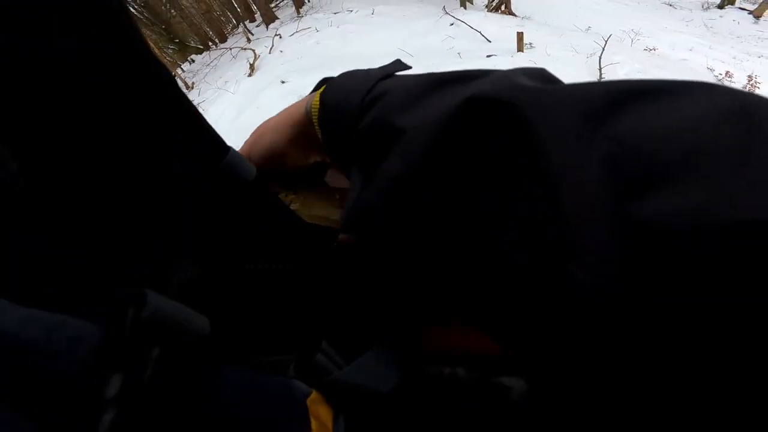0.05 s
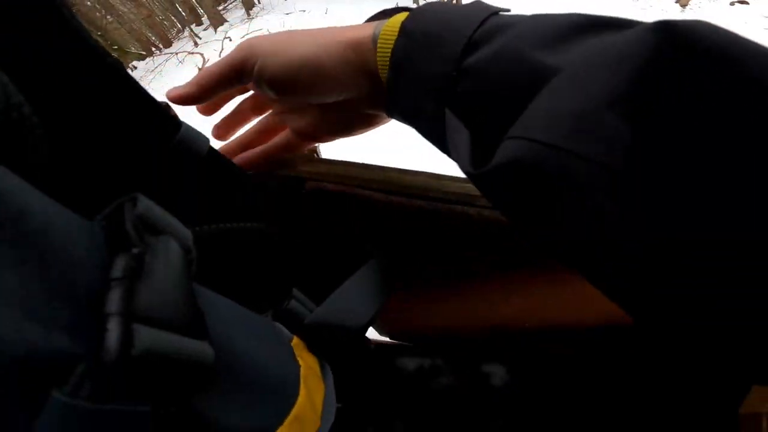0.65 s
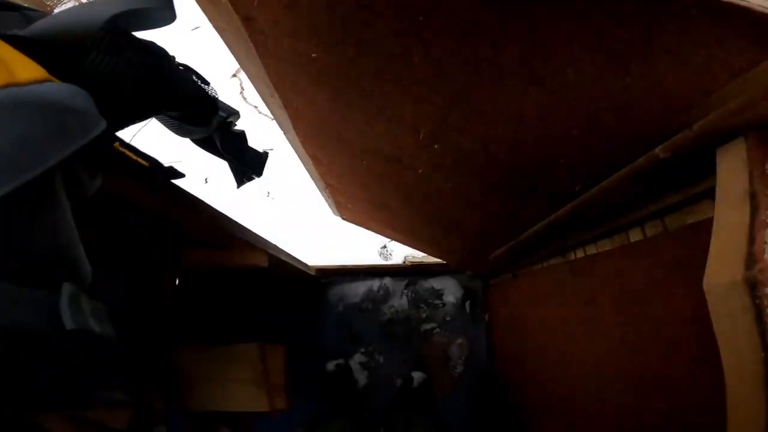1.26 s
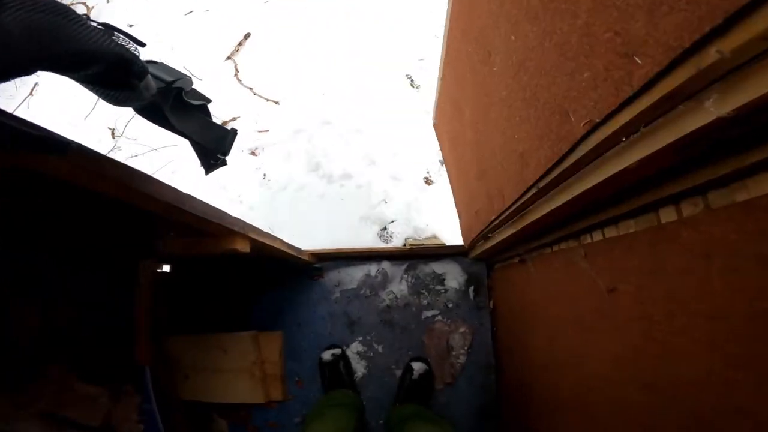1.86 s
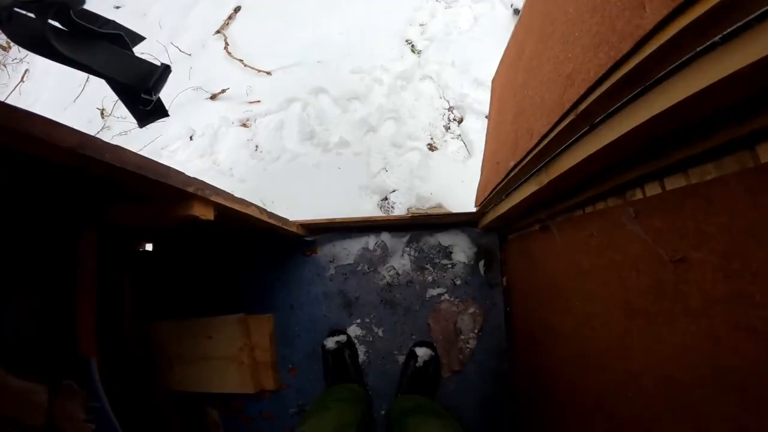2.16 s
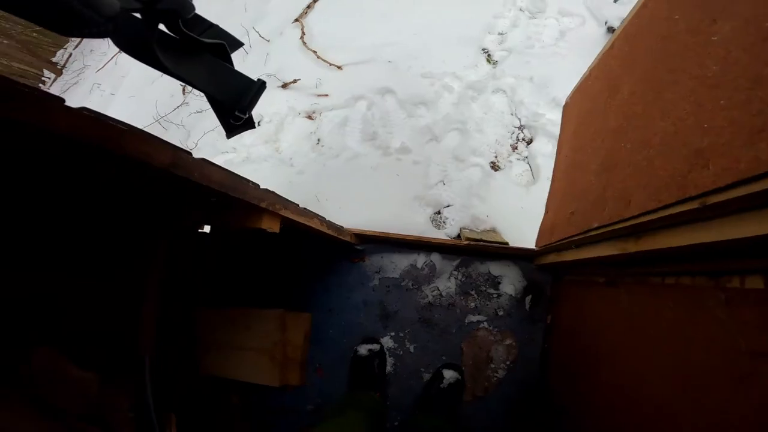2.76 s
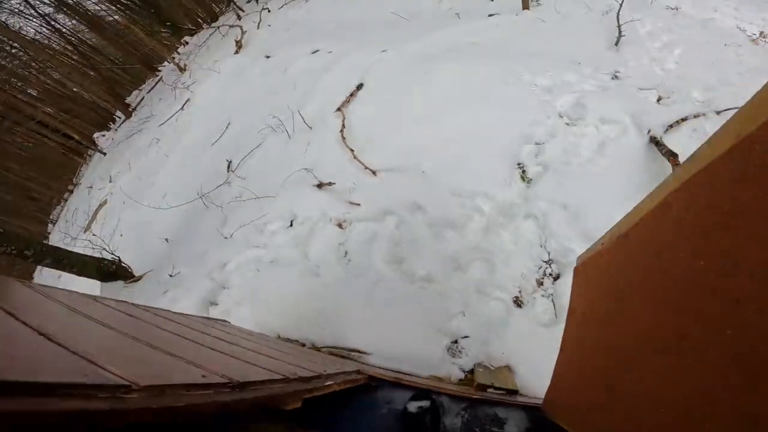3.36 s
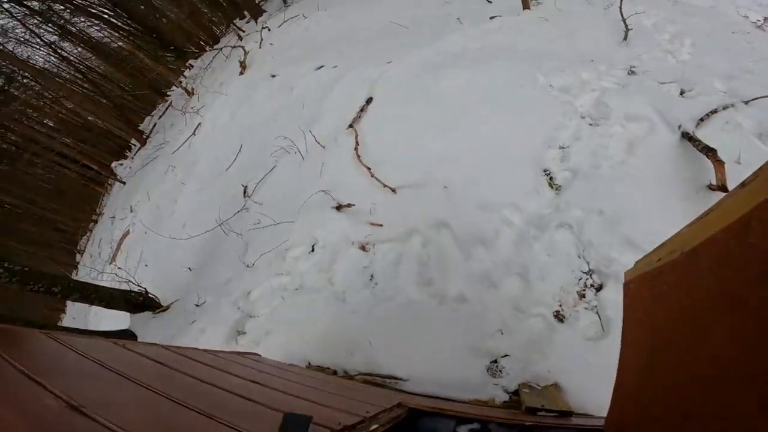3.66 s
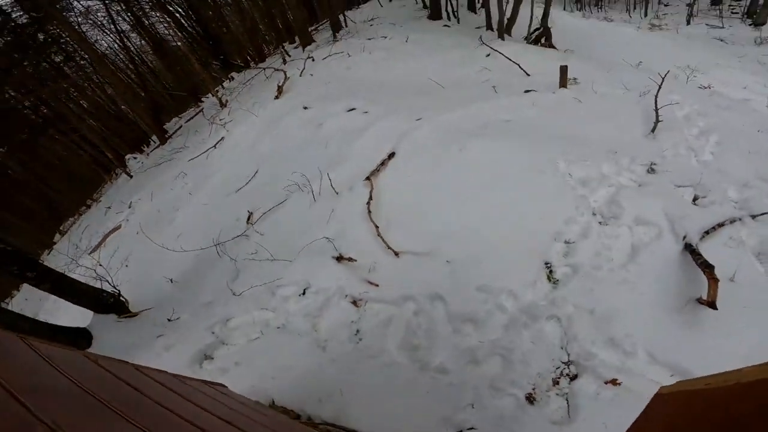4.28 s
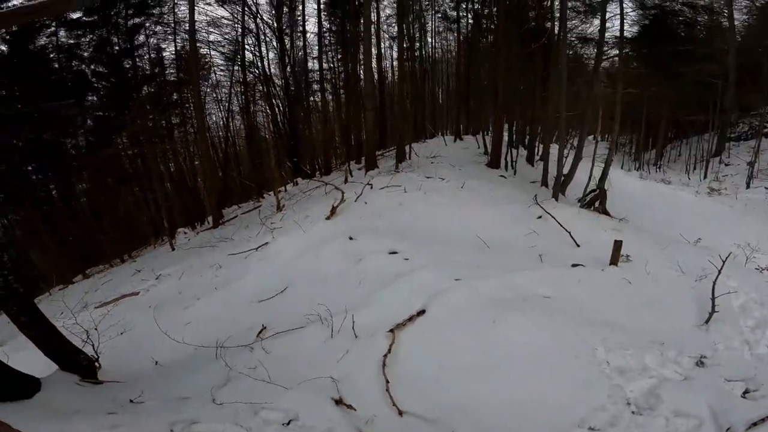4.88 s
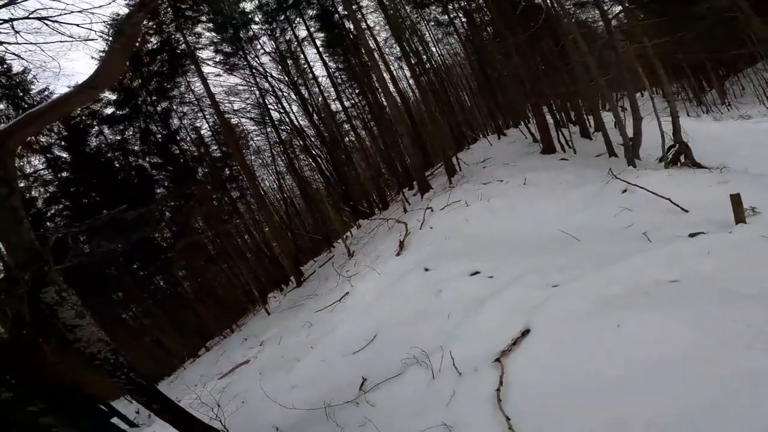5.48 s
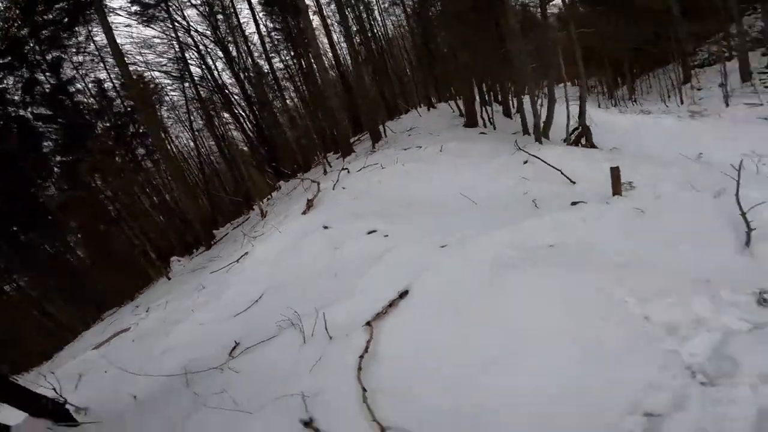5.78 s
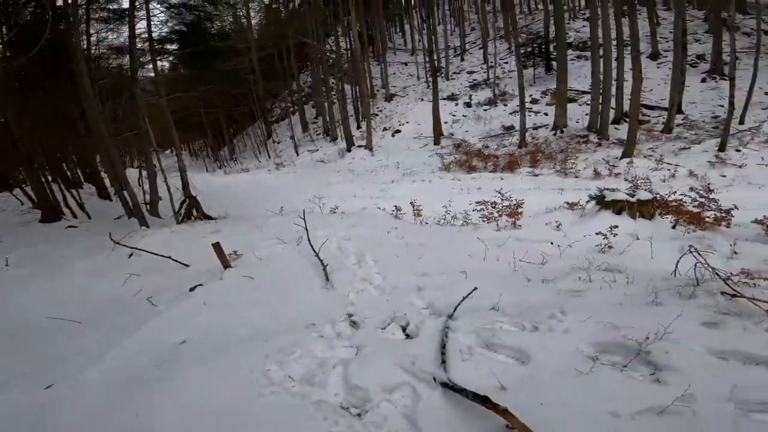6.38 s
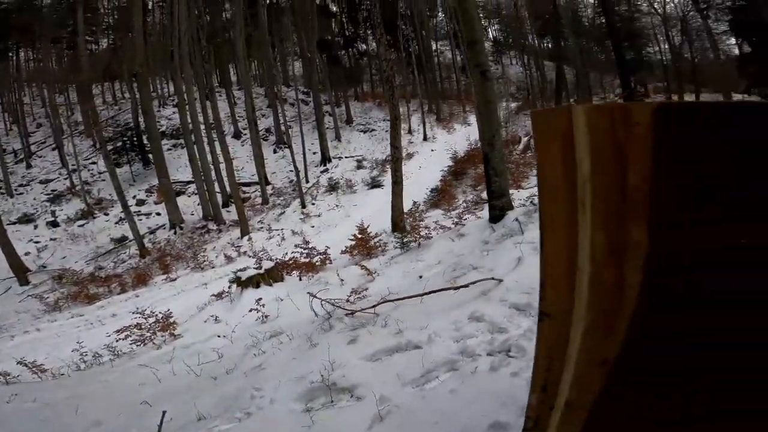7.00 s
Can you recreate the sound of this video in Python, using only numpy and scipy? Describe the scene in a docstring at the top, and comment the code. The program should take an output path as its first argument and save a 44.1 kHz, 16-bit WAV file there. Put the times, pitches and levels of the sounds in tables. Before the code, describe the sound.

Irregular wooden knocks, thumps and small clicks in a little hut, with a jacket rustling and rubbing right against the microphone.

```python
"""Opening a wooden hide in winter

Someone unlatches the board door of a small hide, swings it open and leans out over the snow.
Knocks and footfalls ring in the thin walls and floor. A jacket and rucksack rub, click and bump right
beside a body-worn stereo microphone, mostly on its left. The forest outside is nearly silent."""
import sys
import numpy as np
from scipy import signal
from scipy.io import wavfile

SR = 44100
rng = np.random.default_rng(int(sys.argv[2]) if len(sys.argv) > 2 else 0)


def waveform_to_disk(signal):
    """Save audio, clipped to [-1, 1], as 16-bit WAV at the path in sys.argv[1]."""
    frames = np.transpose(np.atleast_2d(signal))
    scaled = np.clip(frames, -1, 1) * 32767
    samples = np.round(scaled).astype(np.int16)
    wavfile.write(sys.argv[1], SR, samples)


N = 310464
TIME = np.arange(N) / SR
RING_TIME = TIME[:SR // 2]


def from_db(db):
    """Decibels to gain."""
    return 10 ** (np.asarray(db) / 20)


def unit_rms(x, first=None):
    """Scale to rms 1, taken over the whole sound or its first samples."""
    return x / np.sqrt(np.mean(x[..., :first] ** 2) + 1e-20)


def at_hz(points, hz):
    """Read a curve on a log-frequency axis."""
    points_hz, values = np.transpose(points)
    return np.interp(np.log(hz), np.log(points_hz), values)


def band(x, low_hz, high_hz):
    """Butterworth band-pass."""
    sos = signal.butter(2, [low_hz, min(high_hz, SR / 2 - 1000)], "band", fs=SR, output="sos")
    return signal.sosfilt(sos, x)


def drift(rate_hz):
    """Smooth random wander with spread 1."""
    pole = np.exp(-80 * np.pi * rate_hz / SR)
    slow = signal.lfilter([1], [1, -2 * pole, pole * pole], rng.standard_normal(N // 40 + 2002))[2000:]
    return np.interp(np.arange(N) / 40, np.arange(len(slow)), unit_rms(slow))


def rising(rise_s):
    """Smooth build-up of a contact."""
    return 1 - np.exp(-(RING_TIME / max(rise_s, 1e-4)) ** 2)


def dying(t60):
    """Envelope that falls 60 dB in t60 seconds."""
    return np.exp(-np.log(1000) * RING_TIME / max(t60, 1e-3))


def swells(moves, depth_db=8, roundness=1.29):
    """Level in dB of moves that gain depth_db over their rise and lose it over their fall."""
    coarse, power = TIME[::100], 1e-12
    for peak_s, rise_s, fall_s, db in moves:
        away = np.maximum((peak_s - coarse) / max(rise_s, .01), (coarse - peak_s) / max(fall_s, .01))
        power = power + from_db(db - depth_db * away ** roundness) ** 2
    return np.interp(TIME, coarse, 10 * np.log10(power))


def add(out, start, sound):
    """Mix a sound in from start seconds."""
    i = max(int(start * SR), 0)
    out[:, i:i + sound.shape[-1]] += sound[..., :N - i]


def panned(x, pan_db, lag_per_db=0.96):
    """Cloth against one port makes a contact louder there and a few samples late; pan is left - right."""
    x = np.broadcast_to(x, (2, x.shape[-1]))
    leaning = np.array([[1], [-1]]) * pan_db
    gains = from_db(leaning / 2)
    lags = np.round(np.clip(leaning * lag_per_db, 0, 5).mean(axis=1)).astype(int)
    delayed = np.array([np.pad(channel, (lag, 0))[:len(channel)] for channel, lag in zip(x, lags)])
    return delayed * gains / gains.mean(axis=0)


def from_left(x, pan_db, full_db=8, lag_s=.00011):
    """Rubbing on the left is louder at that port and creeps round the housing to it."""
    share = np.clip(pan_db / full_db, 0, 1) ** 2
    left = np.sqrt(1 - share) * x[0] + np.sqrt(share) * np.roll(x[0], round(lag_s * SR))
    return panned(np.array([left, x[1]]), pan_db, lag_per_db=0)


# How alike the microphone's two ports hear a noise. Each row: frequency in Hz, likeness from 0 to 1.
PORT_LIKENESS = [(30, 0.89), (120, 1), (350, 0.93), (800, 0.92), (2000, 0.64), (7000, 0.45), (13000, 0.29)]


def grainy_noise(spectrum, patchy_db, grain_db):
    """Uneven noise, like countless tiny slips, in half-octave bands that flicker; stereo, rms 1."""
    slips = rng.standard_normal((2, 2, N)) * from_db(grain_db * drift(340))
    out, edges = 0, 2 ** np.arange(4, 14.1, .5)
    for k, (low, high) in enumerate(zip(edges, edges[1:])):
        hz = np.sqrt(low * high)
        if spectrum[0][0] <= hz <= spectrum[-1][0]:
            mid, side = band(slips[k % 2], low, high)
            alike = np.clip(at_hz(PORT_LIKENESS, hz), 0, 1)
            gain = from_db(at_hz(spectrum, hz) + patchy_db * drift(12.5))
            out = out + gain * (np.sqrt(1 + alike) * mid + np.sqrt(1 - alike) * side * [[1], [-1]])
    return unit_rms(out)


# The snowy forest, heard from the hide. Each row: frequency in Hz, relative level in dB.
FOREST_SPECTRUM = [(25, 6), (70, -9.5), (110, -12), (180, 3), (330, 1.5), (500, -5), (1500, -4),
                   (7000, -18), (15000, -44)]


def forest(level_db):
    """A faint, low hush behind everything."""
    return from_db(level_db) * grainy_noise(FOREST_SPECTRUM, patchy_db=0.5, grain_db=1.5)


def hide_echo(x, t60, dull_hz, width):
    """Close board walls give a short, dull, nearly centred tail."""
    mid, side = band(rng.standard_normal((2, len(RING_TIME))), 93, dull_hz) * dying(t60)
    tail = np.array([mid, side]) * (1 - dying(0.0033))
    echo = tail[0] + width * band(tail[1], 440, 12000) * [[1], [-1]]
    return signal.fftconvolve(x, echo / np.sqrt(np.sum(tail[0] ** 2)), axes=1)[:, :N]


# The wearer shifts weight. Each row: strongest moment, rise and fall in seconds, level in dB.
WEIGHT_SHIFTS = [(0.06, .1, 0.069, -40.5), (0.3, .06, 0.11, -39.5), (0.57, .12, .08, -31.5),
                 (0.87, .1, 0.17, -38.5), (1.19, .12, 0.47, -49.5), (1.94, .05, 0.39, -55),
                 (2.45, .12, 0.16, -37.5), (2.79, 0.051, .07, -46.5), (3.02, .1, 0.088, -34),
                 (3.3, .12, 0.41, -46.5), (3.68, .06, 0.075, -33.5), (3.96, .15, 0.13, -34.5),
                 (4.54, .1, 0.15, -45.5), (5.17, .12, 0.093, -39.5), (5.33, .06, 0.041, -44),
                 (5.78, .09, 0.091, -31), (5.98, .12, 0.15, -25), (6.8, .07, 0.066, -48.5)]
# Air at the ports in the doorway. Each row: time in seconds, turbulent share from 0 to 1, pan in dB.
DOORWAY_DRAUGHT = [(0, 0, -1.5), (3.4, 0.01, -0.5), (3.7, 0.2, -0.5), (4.1, 0.5, 3), (4.35, 0, -2),
                   (5.55, 0, -1.5), (5.8, 0.35, -6), (6.15, 0.38, -2.5), (6.35, 0, -7), (7.04, 0.1, 1)]
# Handling noise in the microphone housing. Each row: frequency in Hz, relative level in dB.
SWAY_SPECTRUM = [(15, -3.5), (28, -1), (45, -3), (70, -6), (100, -22)]
RUMBLE_SPECTRUM = [(40, -16), (65, 2), (100, -5.5), (150, -12), (260, -39)]


def buffeting(steepness, width):
    """The body sways the housing; harder motion reaches higher, and moving air stirs the ports apart."""
    level_db = swells(WEIGHT_SHIFTS)
    rumble_db = level_db - 3.0 + steepness * (level_db + 39)
    times, share, pan_db = np.transpose(DOORWAY_DRAUGHT)
    turbulence = np.clip(np.interp(TIME, times, share), 0, 1)
    sway = from_db(level_db + 1.0) * grainy_noise(SWAY_SPECTRUM, patchy_db=2.0, grain_db=0.5)[0]
    rumble = from_db(rumble_db) * grainy_noise(RUMBLE_SPECTRUM, patchy_db=1.5, grain_db=2.0)[0]
    eddies = width * from_db(level_db) * unit_rms(band(rng.standard_normal(N), 25, 130)) * [[1], [-1]]
    buffets = sway + rumble + np.sqrt(turbulence) * eddies
    return panned(buffets, np.interp(TIME, times, pan_db), lag_per_db=-2)


def crinkles(per_s, size_db):
    """Stiff nylon buckles in tiny scattered ticks; rms 1."""
    born = rng.random(N) < per_s / SR
    ticks = born * from_db(size_db * np.minimum(rng.exponential(1, N), 3)) * rng.choice([-1, 1], N)
    return unit_rms(band(ticks, 2200, 7600))


# The jacket slides with each move of arm or trunk, right at the microphone. Each row: fastest moment,
# rise and fall in seconds, then level, extra drag on the housing and extra nylon hiss in dB.
JACKET_MOVES = [(0.01, 0.081, 0.073, -55, 5.5, 5.5), (0.35, 0.14, 0.19, -51, 5.5, -4),
                (0.56, 0.17, .12, -55.5, 9, -2), (0.85, 0.14, 0.15, -50, 2.5, -3),
                (1.16, 0.088, 0.09, -46.5, 2.5, -3.5), (2.0, 0.32, 0.29, -59.5, 0.5, 3.5),
                (2.24, 0.24, 0.048, -56, -3.5, -2.5), (2.43, 0.084, 0.082, -45, -0.5, -6.5),
                (2.7, 0.06, 0.058, -49, -4.5, -11), (2.97, 0.1, 0.12, -45, -5.5, -4),
                (3.17, 0.28, 0.13, -56, 1, 5.5), (3.41, 0.21, 0.14, -47, -1.5, -3.5),
                (3.68, 0.16, 0.23, -47, -5, 2), (3.89, 0.11, 0.1, -44.5, 1.5, 0),
                (4.35, 0.31, 0.42, -54.5, 0, 0.5), (4.71, 0.13, 0.17, -50.5, -3.5, -2.5),
                (5.07, 0.11, 0.16, -43.5, -4, 1.5), (5.36, 0.27, 0.36, -49.5, -4.5, 0),
                (5.841, 0.12, 0.17, -51.5, 9, 1.5), (5.99, 0.097, 0.076, -53.5, 5.5, -12),
                (6.33, 0.12, 0.098, -58, 6, 0), (6.7, 0.034, 0.044, -54, -3.5, 6.5),
                (6.9, 0.36, 0.24, -58, -0.5, -1)]
# The side the cloth lies on. Each row: time in seconds, lean to the left in dB (scaled for each layer).
CLOTH_LEAN = [(0.0, -1), (2.23, 3), (2.35, -1.5), (2.72, 0.5), (3.02, 14), (3.1, 3.5), (3.27, 7),
              (3.96, 1.5), (4.76, 11.5), (6.61, 5), (6.69, 3.5), (7.04, 2.5)]
# Four colours of rubbing, low to high. Each row: frequency in Hz, relative level in dB.
DRAG_SPECTRUM = [(70, -34), (130, 2.5), (180, -1.5), (260, -3), (380, -4.5), (520, -12.5), (900, -24)]
SWISH_SPECTRUM = [(300, -22), (550, -1.5), (750, -1.5), (1050, -0.5), (1500, 1.5), (2300, -23)]
BRUSH_SPECTRUM = [(1400, -2), (2000, 3), (2800, -4), (3500, -1), (4400, -16), (6500, -29)]
HISS_SPECTRUM = [(2500, -13), (4300, 1.5), (6000, -1), (7600, -3.5), (10000, -9.5), (12500, -10),
                 (15500, -30)]


def jacket():
    """Cloth drags on the housing, slides on itself (swish, brush, hiss) and buckles (grit)."""
    peak_s, rise_s, fall_s, level_db, press_db, smooth_db = np.transpose(JACKET_MOVES)
    offsets_db = (4.5 + press_db, 0, -1.5 + 0.77 * smooth_db, -7.0 + smooth_db)
    drag_db, swish_db, brush_db, hiss_db = [
        swells(zip(peak_s, rise_s, fall_s, level_db + offset)) for offset in offsets_db]
    lean_db = np.interp(TIME, *np.transpose(CLOTH_LEAN))
    folds_db = 0.84 * drift(24)   # folds catch and let go
    drag = from_db(drag_db + folds_db) * grainy_noise(DRAG_SPECTRUM, patchy_db=2.0, grain_db=2.0)
    swish = from_db(swish_db + folds_db) * grainy_noise(SWISH_SPECTRUM, patchy_db=2.5, grain_db=2.0)
    brush = from_db(brush_db + folds_db) * grainy_noise(BRUSH_SPECTRUM, patchy_db=1.0, grain_db=1.5)
    nylon = grainy_noise(HISS_SPECTRUM, patchy_db=2.0, grain_db=1.5)
    nylon += from_db(-10.5) * crinkles(per_s=260, size_db=2.5)
    hiss = from_db(hiss_db + folds_db) * nylon
    grit = from_db(swish_db - 13) * unit_rms(band(crinkles(per_s=45, size_db=3.5), 900, 4160))
    cloth = from_left(swish, 1.4 * lean_db) + from_left(brush, 0.84 * lean_db)
    cloth += from_left(hiss, 0.5 * lean_db, full_db=12) + panned(grit, 1.7 * lean_db, lag_per_db=0)
    # a board close by reflects the rustle and combs it as the body moves
    path_s = .0021 * (1 + 0.11 * drift(0.37))
    reflection = np.array([np.interp(TIME - path_s, TIME, channel) for channel in cloth])
    return from_left(drag, 0.12 * lean_db) + cloth + from_db(-9.5) * reflection


# Short bands of noise, close by: brushes, scrapes, creaks and the sharp edge of a clack. Each row:
# start and end in seconds, level in dB, centre in Hz, bandwidth in octaves, pan in dB.
NOISE_BURSTS = [(0.305, 0.341, -41, 1050, 0.68, -2), (0.77, 0.783, -56.5, 4970, 1.5, 0),
                (0.813, 0.923, -47, 1240, 0.57, -1), (1.007, 1.105, -50.5, 750, 0.6, 0),
                (1.117, 1.125, -31, 1500, 0.78, 1), (2.44, 2.549, -41.5, 210, 0.78, 1),
                (2.626, 2.713, -50.5, 2180, 1, -1.5), (2.903, 3.052, -46.5, 7100, 1.04, 4),
                (2.96, 2.986, -39.5, 3400, 0.78, 6), (3.297, 3.5, -54, 3480, 0.56, 4),
                (3.633, 3.658, -43, 1200, 2.6, 4), (4.326, 4.34, -43, 1800, 2.2, -2.5),
                (4.336, 4.34, -26.5, 7400, 0.79, 0.5), (4.3464, 4.35, -23.5, 2560, 1.46, 0.5),
                (4.967, 5.548, -55, 2800, 0.29, 6), (5.132, 5.14, -37.5, 2180, 0.51, 10),
                (5.153, 5.177, -36.5, 910, 1.9, 21), (6.672, 6.765, -50, 560, 1.9, 1),
                (6.694, 6.804, -40, 189, 1.86, 1)]


def noise_bursts(grain_db, width):
    """Each burst is grainy noise that swells and fades in one band."""
    out, grain = np.zeros((2, N)), from_db(grain_db * drift(300))
    for start, end, db, hz, octaves, pan_db in NOISE_BURSTS:
        i, size = int(start * SR), max(int((end - start) * SR), 64)
        noise = rng.standard_normal((2, size)) * grain[i:i + size]
        half_band = 2 ** (max(octaves, .1) / 2)
        mid, side = band(noise, hz / half_band, hz * half_band) * np.sqrt(np.hanning(size))
        stereo = mid + width * min(hz / 1000, 1) * side * [[1], [-1]]
        add(out, start, panned(from_db(db) * unit_rms(stereo), pan_db))
    return out


# Cloth squeaks beside the microphone. Each row: start and end in seconds, first and last pitch in Hz,
# level in dB, pan in dB.
CLOTH_SQUEAKS = [(2.321, 2.361, 1326, 957, -30.5, -2), (3.003, 3.028, 984, 1536, -19, 15),
                 (3.44, 3.445, 3580, 3450, -26.5, 1), (4.947, 4.951, 3630, 3050, -15.5, 12)]


def squeaks(wobble, rough_db):
    """Uneven stick-slip swells and glides until the contact lets go."""
    out, flutter, waver = np.zeros((2, N)), from_db(rough_db * drift(370)), drift(182)
    for start, end, start_hz, end_hz, db, pan_db in CLOTH_SQUEAKS:
        along = np.linspace(0, 1, max(int((end - start) * SR), 2))
        now = int(start * SR) + np.arange(len(along))
        hz = (start_hz + (end_hz - start_hz) * along ** 2) * (1 + wobble * waver[now])
        swell = along * np.minimum(1, 10 * (1 - along)) * unit_rms(flutter[now])
        add(out, start, panned(from_db(db) * swell * np.sin(2 * np.pi * np.cumsum(hz) / SR), pan_db))
    return out


# Brief, close pulses: microphone bumps, small knocks and a door clack. Each row: start in seconds,
# level in dB, pitch in Hz, pan in dB.
BRIEF_PULSES = [(0.8165, -30, 1010, -1), (1.1157, -21, 1320, -2), (1.118, -26.5, 190, 6),
                (1.1429, -17.5, 760, 5), (1.411, -26.5, 1000, -1.5), (2.368, -24.5, 1480, -3.5),
                (2.400, -30, 1100, -1), (2.435, -31, 1300, -2), (2.524, -26.5, 1380, 3),
                (2.9645, -18, 850, 14), (3.0245, -16, 680, 12), (3.0273, -11, 208, 2),
                (3.032, -14, 105, -1), (3.682, -25, 1100, -7), (4.049, -24.5, 220, -11),
                (4.3302, -19.5, 192, -2.5), (5.17, -20, 376, 11), (5.1365, -25, 1500, 10),
                (5.696, -21.5, 111, 2), (5.871, -18.5, 151.3, -5), (5.922, -18, 208, -18),
                (6.348, -15, 110, 1), (6.765, -19.5, 810, 1.5), (6.767, -17.5, 200, -0.5)]


def pulses(cycles, trim_db, rise_cycles):
    """Each pulse swells and dies within a few cycles."""
    out = np.zeros((2, N))
    for start, db, hz, pan_db in BRIEF_PULSES:
        tone = np.sin(2 * np.pi * hz * RING_TIME) * dying(cycles / hz) * rising(rise_cycles / hz)
        pulse = band(tone, hz / 6, hz * 2)
        add(out, start, panned(from_db(db + trim_db) * pulse / np.abs(pulse).max(), pan_db))
    return out


def struck(modes, low_hz, high_hz, length, scatter_db, whole_hz=270):
    """Ring the modes in a band. Low ones all follow the push; higher ones vary with the spot struck."""
    out = np.zeros(len(RING_TIME))
    for hz, db, t60 in modes:
        spot = from_db(scatter_db * rng.standard_normal()) * rng.choice([-1, 1])
        if low_hz <= hz < high_hz:
            gain = from_db(db) * (1 if hz < whole_hz else spot)
            out += gain * dying(t60 * length) * np.sin(2 * np.pi * hz * RING_TIME)
    return out


# Latch, buckles and zip, close up. Each row: start in seconds, level in dB, sharpness as extra dB on
# the edge modes, pan in dB.
FITTING_CLICKS = [(0.1147, -43.5, -5, -0.5), (0.3028, -46.5, -5, -5), (0.4668, -33, -8.5, -2),
                  (0.5464, -43, -14, 1), (1.1046, -44, 8, 0.5), (1.1164, -48, 6, -2), (1.141, -43, -5, -2),
                  (1.356, -52.5, -5, 0), (2.367, -40.5, -17, 0), (2.398, -43.5, -20, -.5),
                  (2.4333, -52, -7, 1), (2.461, -42.5, -4.5, -.5), (2.5243, -47.5, -9, 0),
                  (2.8963, -44, 6.5, 8.5), (2.912, -33.5, 2.5, 8.5), (2.964, -29.5, -12, 9),
                  (2.9714, -42, -15, 13), (3.0208, -39, 3, 9.5), (3.026, -30, 8.5, 3.5),
                  (3.384, -38, -4, 1.5), (3.4402, -38, 0, 17), (3.7113, -30.5, -2, 5),
                  (4.1058, -47, -1, 0.5), (4.3343, -22, -3, 0), (4.347, -32, 4.5, -1), (4.946, -29, -23, 6),
                  (5.1355, -49, -17, 9), (5.1667, -28, -29, 7), (5.2894, -39, -3, 5),
                  (5.9698, -54.5, 11.5, 2.5), (6.3338, -46.5, -1, -2.5)]
# How those fittings ring. Each row: frequency in Hz, relative level in dB, t60 in seconds.
FITTING_MODES = [(1415, 17, 0.0051), (1954, -0.5, 0.0043), (2580, 1, 0.0056), (3050, -5, 0.0078),
                 (3646, -12.5, 0.043), (4560, 4, 0.013), (5190, 12, 0.004), (5990, 9, 0.0062),
                 (7360, 11, 0.0084), (9900, 0, 0.015), (11500, -33.5, .005)]


def clicks(body_db, edge_db, crack_db, crack_t60, width, rise_s):
    """Hard fittings scuff and snap: a brief gritty crack and a few short modes."""
    out = np.zeros((2, N))
    for start, level_db, sharp_db, pan_db in FITTING_CLICKS:
        for low, high, share_db in [(1370, 3800, body_db), (4430, 9200, sharp_db + edge_db)]:
            scuff = band(rng.standard_normal((2, len(RING_TIME))), low, high)
            mid, side = band(scuff, 1000, 8900) * dying(crack_t60)
            crack = unit_rms(mid + width * side * [[1], [-1]], first=400)
            ring = unit_rms(struck(FITTING_MODES, low, high, length=1, scatter_db=5), first=400)
            snap = unit_rms((ring + from_db(crack_db) * crack) * rising(rise_s), first=400)
            add(out, start, panned(from_db(level_db + share_db) * snap, pan_db))
    return out


# Low thuds and single ringing board notes, dead centre, many sounding with a knock. Each row: start in
# seconds, level in dB, pitch in Hz, t60 in seconds.
BOARD_NOTES = [(0.063, -29, 65, 0.29), (0.138, -30, 168, 0.15), (0.338, -30.5, 404, .25),
               (0.414, -20.5, 165, 0.074), (0.4651, -13, 942, 0.053), (0.482, -25, 720, 0.13),
               (0.490, -19.5, 202, 0.38), (0.549, -18.5, 943, 0.038), (0.5488, -11, 413, 0.084),
               (0.556, -19, 319, 0.12), (0.830, -14.5, 160.7, 0.13), (2.353, -12.5, 55.3, 0.32),
               (2.706, -27, 44.8, 1), (3.673, -25, 55.6, 0.12), (4.341, -23.5, 67.6, 0.3),
               (4.347, -6, 179, 0.11), (4.981, -24.5, 107, 0.13), (5.123, -25, 184, 0.12),
               (5.176, -17, 84, 0.12), (5.291, -12.5, 184, 0.066), (5.737, -13, 62.7, 0.17),
               (5.904, -8.5, 57, 0.073), (5.971, -17.5, 71.6, 0.28), (6.343, -21.5, 78, 0.19),
               (6.368, -19, 186, 0.17)]


def board_notes(rise_s):
    """Each note is one mode of the wood that builds up and dies away at its own pitch."""
    out = np.zeros((2, N))
    for start, db, hz, t60 in BOARD_NOTES:
        envelope = dying(t60) * (1 - dying(rise_s))
        add(out, start, from_db(db) * np.sin(2 * np.pi * hz * RING_TIME) * envelope)
    return out


# Blows on door and walls, heard from inside. Each row: start in seconds, level in dB, hardness as dB
# gained per higher mode family, ring length factor, pan in dB.
WOOD_KNOCKS = [(0.062, -51, 3.5, 0.74, -2), (0.13, -38.5, -0.5, 0.7, 0), (0.24, -45.5, 4.5, 0.92, -2),
               (0.34, -41, 3.5, 0.7, -1), (0.4, -34.5, 6, 0.35, -.5), (0.415, -29.5, -4.5, 0.7, -2),
               (0.464, -27.5, 4.5, 0.67, 1.5), (0.481, -26.5, -1.5, 0.66, -2), (0.547, -23.5, 0, 0.92, 2),
               (0.829, -34.5, -2, .8, -3), (2.418, -36, -5, 0.32, 1), (2.457, -38, 0.5, 1.0, -2),
               (2.902, -29, -4, 0.93, 8), (2.925, -30.5, -3.5, 0.96, 0), (3.108, -38.5, 1, 0.96, -2),
               (3.61, -36.5, 0, 0.93, 9), (3.712, -35, 2.5, 0.52, 4.5), (3.756, -34, -5, 0.36, 5),
               (4.335, -27.5, 0, 0.75, 2), (4.348, -23, -1.5, 0.56, 3), (4.462, -42, 1.5, 1.0, 6),
               (4.599, -44, -5.5, 0.93, 6), (4.896, -41.5, 6.5, .6, 3.5), (4.948, -33.5, 5, 1.0, 8.5),
               (4.979, -37.5, -2.5, 0.5, -1), (5.111, -31, -3, 1.0, 5), (5.167, -28.5, 0.5, 0.74, 4),
               (5.28, -37, 1.5, 0.56, 9), (5.292, -34, -5, 0.87, 4), (5.566, -40, 0, .6, 5),
               (5.835, -33.5, -2, .7, 2), (6.3, -40.5, -3, .55, 3), (6.334, -31, -4, 0.64, 5.5)]
# How the hide rings. Each row: frequency in Hz, relative level in dB, t60 in seconds at length factor 1.
HIDE_MODES = [(58.8, 2, 0.49), (82, 7, 0.15), (109.5, 8.5, 0.15), (149.5, -9, 0.28), (170.7, -1, 0.18),
              (195.2, -8.5, 0.17), (242.5, -10.5, 0.2), (287, -4.5, 0.06), (339, -1, 0.12),
              (390.2, -2, 0.16), (449, -7, 0.1), (534, -4, 0.06), (618, 0, 0.067), (712, 0, 0.066),
              (777, -4.5, 0.079), (948, 2, 0.045), (1041, 3, 0.046), (1175, 3, 0.032), (1330, -3, 0.029),
              (1500, -23, 0.05)]
# Frame, panel, board and rap mode families: their borders in Hz, then their levels in dB at hardness 0.
FAMILY_EDGES_HZ = [40, 125, 260, 560, 1650]
FAMILY_LEVELS_DB = [-3, -3, -6, -11]


def knocks(chatter_db, chatter_t60, contact_s):
    """Each blow rings four mode families, the higher ones more the harder it is; loose joints chatter."""
    out = np.zeros((2, N))
    steps = np.arange(4) - 1.25
    families = list(zip(FAMILY_EDGES_HZ, FAMILY_EDGES_HZ[1:], FAMILY_LEVELS_DB, steps))
    for start, level_db, hardness_db, length, pan_db in WOOD_KNOCKS:
        for low, high, family_db, step in families:
            ring = unit_rms(struck(HIDE_MODES, low, high, length, scatter_db=3.0), first=1000)
            loose = band(band(rng.standard_normal(len(RING_TIME)), low, high), low, high)
            chatter = unit_rms(loose * dying(chatter_t60 * length), first=1000)
            hit = unit_rms((ring + from_db(chatter_db) * chatter) * (1 - dying(contact_s)), first=1000)
            gain = from_db(level_db + family_db + hardness_db * step)
            # long waves reach both sides alike
            add(out, start, panned(gain * hit, pan_db * min(high / 900, 1)))
    return out


def scene():
    """Contacts in the hide, the jacket at the microphone, the forest behind."""
    wood = knocks(chatter_db=-7, chatter_t60=0.085, contact_s=0.016)
    fittings = clicks(body_db=-5, edge_db=-7.5, crack_db=-4.5, crack_t60=0.031, width=0.26, rise_s=0.0011)
    rubs = squeaks(wobble=0.1, rough_db=7.5) + noise_bursts(grain_db=4.5, width=0.17)
    thumps = pulses(cycles=1.44, trim_db=-0.6, rise_cycles=0.6) + board_notes(rise_s=0.033)
    wearer = jacket() + buffeting(steepness=0.29, width=0.64)
    outside = forest(level_db=-60)
    # the walls fill the hide with sound; fittings at the microphone stay nearly dry
    into_room = from_db(-12.0) * wood + from_db(-20.0) * (fittings + rubs)
    echo = hide_echo(into_room, t60=0.15, dull_hz=3500, width=0.17)
    return wood + fittings + rubs + thumps + wearer + echo + outside


def record(dry):
    """The deepest sway is dropped and the top is cut steeply."""
    low_cut = signal.butter(1, 14, "high", fs=SR, output="sos")
    high_cut = signal.ellip(10, .1, 80, 15200, fs=SR, output="sos")
    return signal.sosfilt(high_cut, signal.sosfilt(low_cut, dry))


dry = scene()
out = record(dry)
waveform_to_disk(out)
```